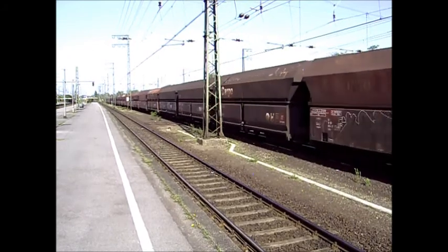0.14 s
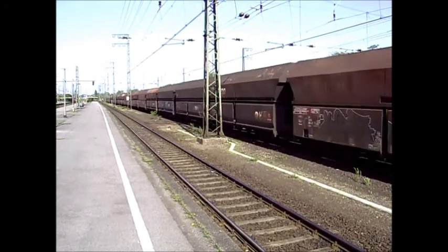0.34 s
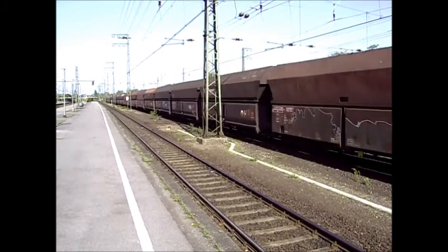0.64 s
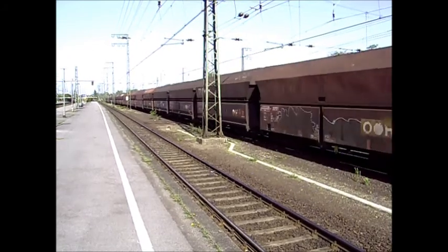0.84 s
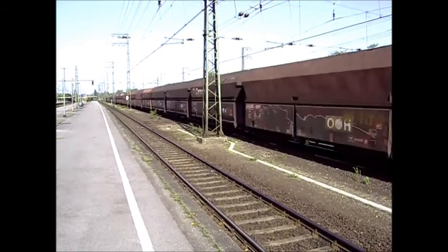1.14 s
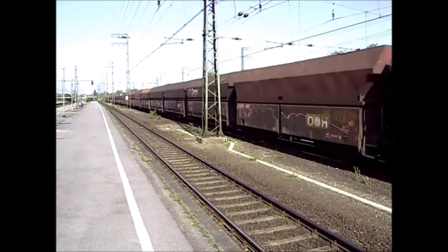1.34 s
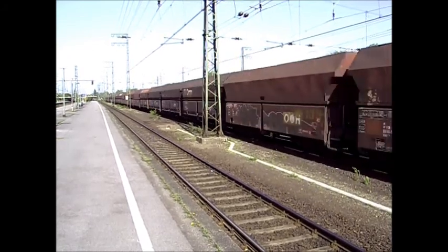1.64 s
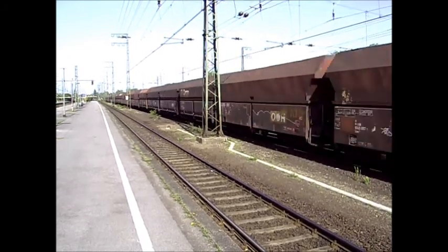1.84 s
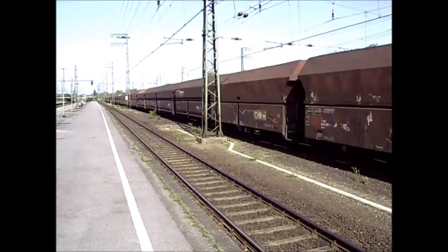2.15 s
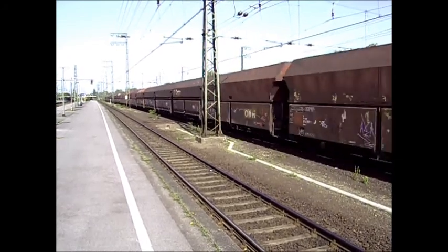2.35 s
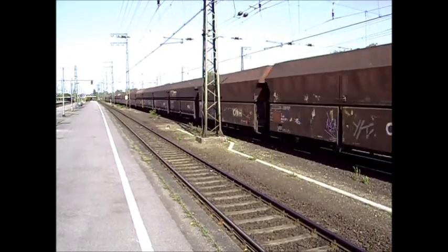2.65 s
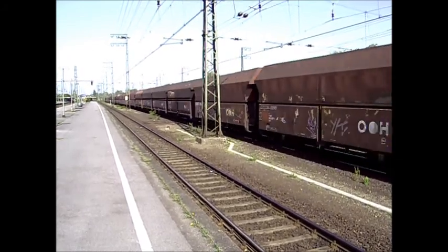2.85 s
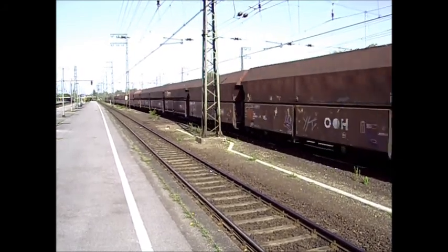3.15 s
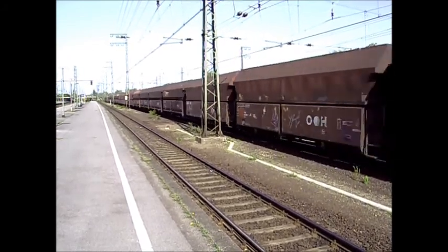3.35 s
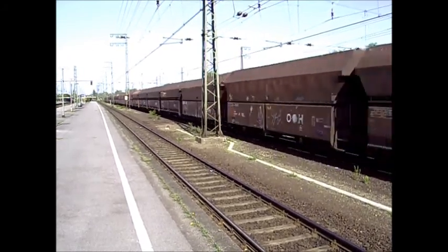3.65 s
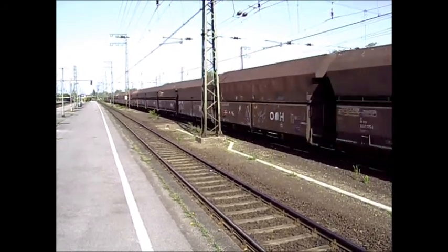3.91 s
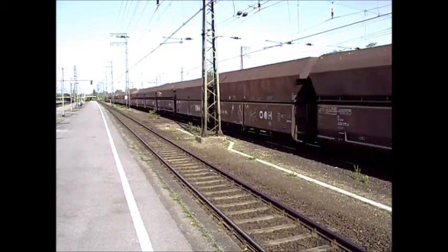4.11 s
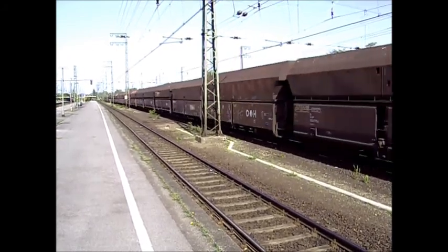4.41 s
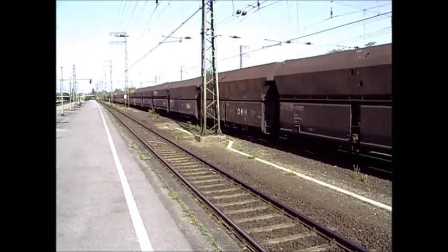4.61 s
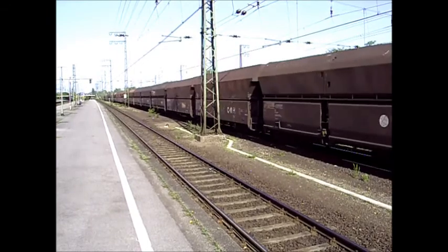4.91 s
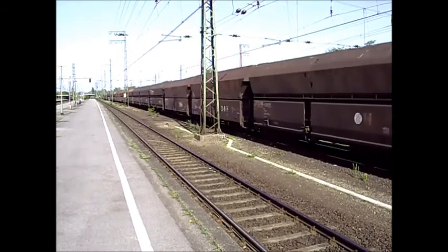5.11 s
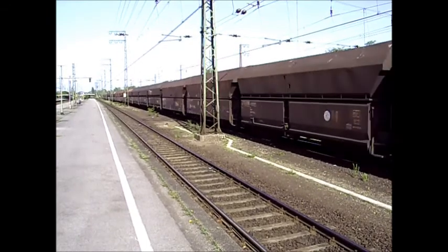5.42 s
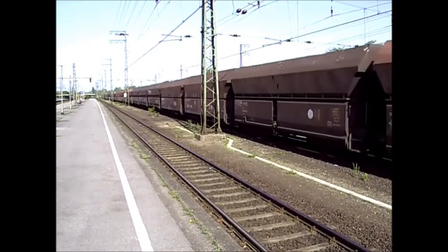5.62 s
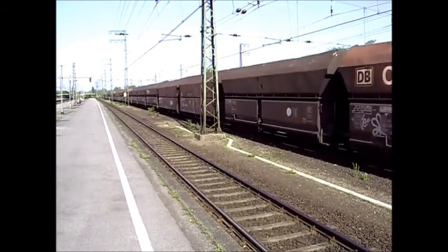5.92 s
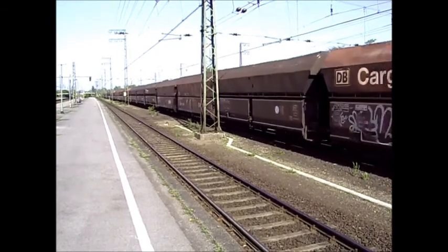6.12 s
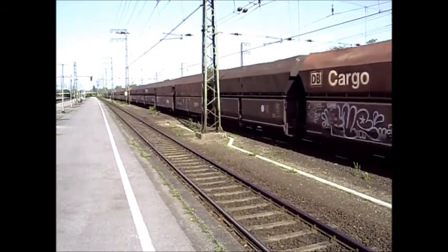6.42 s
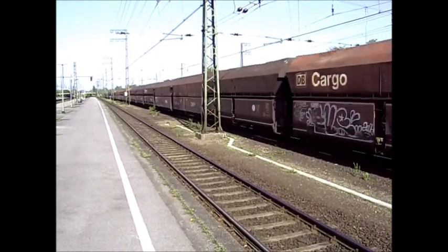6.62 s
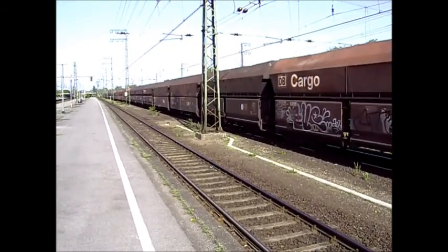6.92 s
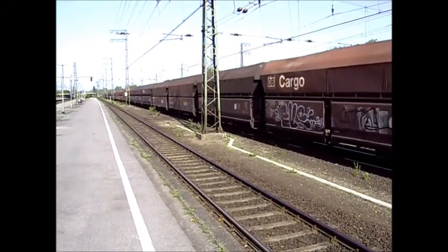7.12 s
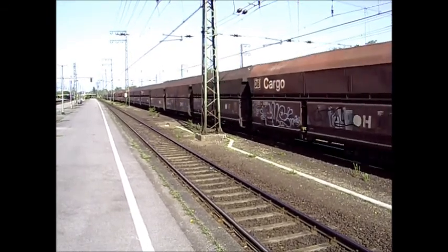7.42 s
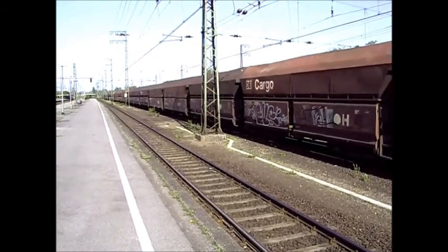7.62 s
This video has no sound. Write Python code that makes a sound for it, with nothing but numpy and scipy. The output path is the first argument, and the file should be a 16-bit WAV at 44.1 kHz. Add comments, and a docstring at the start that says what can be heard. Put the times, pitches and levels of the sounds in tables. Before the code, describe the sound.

Heard from an open station platform, a slow train of empty-sounding steel hopper wagons passes a few tracks away. A piercing wheel squeal dominates from the start, surging and sinking slightly in pitch, with brief higher and lower whistles. Beneath it are gritty flange hiss, steady rolling rumble, hollow thuds and small metallic ticks. The squeal dips midway, returns, then thins near the end with short scraping bursts. The small camera microphone cuts off the highest treble.

```python
"""Hopper train squealing through a station

From the platform, a few tracks off, a small camera's microphone hears a long, slow train of hopper wagons.
Wheels slip sideways on the rail and squeal in their own modes, direct and scattered by wagons and ballast.
One slow course of slip, with brief surges, drives the main squeal and the grinding of the flanges.
Under it wheels roll as shaped noise, wagon bodies resonate, and the running gear ticks and thuds."""
import sys
import numpy as np
from scipy import signal
from scipy.fft import rfft, irfft, next_fast_len
from scipy.io import wavfile
from scipy.ndimage import uniform_filter1d

SR = 44100
rng = np.random.default_rng(int(sys.argv[2]) if len(sys.argv) > 2 else 0)


def wrap_up_sound(samples):
    """Save the sound to the file named by the first command line argument, as 16-bit audio."""
    columns = np.atleast_2d(samples).T
    # keep every value between -1 and 1, then stretch to whole-number steps
    tamed = np.clip(columns, -1, 1)
    steps = np.round(tamed * 32767).astype(np.int16)
    wavfile.write(sys.argv[1], SR, steps)


N = 342216
TIME = np.arange(N) / SR
FREQ = np.maximum(np.fft.rfftfreq(N, 1 / SR), 1)  # kept above zero for logarithms and division


def undb(db):
    """Decibels to gain."""
    return 10 ** (np.asarray(db) / 20)


def unit(x):
    """Scale to rms 1."""
    return x / np.sqrt(np.mean(np.abs(x) ** 2))


def curves(table):
    """The columns of a table after its times, joined by lines, one value a sample."""
    times, *columns = np.transpose(table)
    return [np.interp(TIME, times, column) for column in columns]


def colour(x, points):
    """Filter by a spectrum of f/Hz, level/dB points, joined by lines over log frequency."""
    hz, db = np.transpose(points)
    gain = undb(np.interp(np.log(FREQ), np.log(hz), db))
    return irfft(rfft(x) * gain, N)


def resonate(x, hz, width):
    """One resonance, gain 1 at its centre."""
    detuning = (FREQ ** 2 - hz ** 2) / (FREQ * width)
    return irfft(rfft(x) / (1 + 1j * detuning), N)


def noise():
    """White noise."""
    return rng.standard_normal(N)


def fading(width, steep=2):
    """Random complex gain: the sum of many paths whose Doppler shifts spread over width Hz."""
    shift = np.abs(np.fft.fftfreq(N // 32, 32 / SR))  # made at a 32nd of the sample rate
    paths = np.exp(2j * np.pi * rng.random(len(shift)))
    spread = np.sqrt(1 + (shift / width) ** (2 * steep))
    gain = np.fft.ifft(paths / spread)
    return unit(signal.resample(gain, next_fast_len(N))[:N])


def walk(rate):
    """Smooth random motion of rms 1, averaged twice over 1/rate seconds."""
    knots = rng.standard_normal(int(N / SR * 200))  # 200 a second
    window = max(int(200 / rate), 1)
    slow = uniform_filter1d(uniform_filter1d(knots, window), window)
    return unit(np.interp(TIME, np.linspace(0, N / SR, len(slow)), slow))


def turn(middle, span):
    """A smooth change from 0 to 1 around a moment."""
    return 1 / (1 + np.exp((middle - TIME) / span))


SWELL_SHAPE = 0.36  # power of the half sine: lower is squarer


def swell(start, length):
    """A source starts to sing, holds on for a while and lets go."""
    along = np.clip((TIME - start) / length, 0, 1)
    return np.abs(np.sin(np.pi * along)) ** SWELL_SHAPE


def decay(start, t60, rise):
    """Envelope of one blow: a straight rise times a fall of 60 dB in t60 seconds."""
    age = np.maximum(TIME - start, 0)
    fall = np.exp(-np.minimum(np.log(1000) * age / t60, 20))
    return np.minimum(age / rise, 1) * fall


def squeal(hz, direct_db, spread_hz, waver_hz, steep=2):
    """A wheel mode kept going by stick-slip: a wavering direct tone plus its scattered copies."""
    phase = 2 * np.pi * np.cumsum(hz + waver_hz * walk(25)) / SR
    direct = undb(direct_db + 2.1 * walk(24))
    paths = (direct + fading(spread_hz, steep)) / np.sqrt(1 + undb(direct_db) ** 2)
    return np.sqrt(2) * np.real(paths * np.exp(1j * phase))


# how hard the wheels slip, as a nominal level of their squeal: t/s, level/dB
SLIP_COURSE = [(0, -32.5), (0.25, -34.5), (0.42, -28.5), (0.85, -29.5), (1.1, -25.5), (1.6, -32),
               (1.93, -30.5), (2.15, -32.5), (2.5, -29), (2.8, -25.5), (3.4, -29), (3.7, -26),
               (4.08, -36.5), (4.35, -40.5), (5.15, -29), (5.75, -35), (6.7, -36.5), (7.76, -40)]
# brief surges, when a flange is thrown against the rail: t/s, extra level/dB
FLANGE_SURGES = [(.06, 0.5), (2.108, 8), (2.28, 5.5), (5.85, 2.5), (6.34, 4), (6.85, 3), (6.96, 4),
                 (7.24, 7.5), (7.468, 7.5), (7.65, 5.5)]
SURGE_S, USUAL_SLIP_DB = 0.047, -31  # spread of a surge (Gaussian sigma); reference level of the slip


def slipping():
    """Sideways slip in dB above the usual: a slow course with brief surges."""
    slow_db, = curves(SLIP_COURSE)
    surges_db = sum(db * np.exp(-.5 * ((TIME - s) / SURGE_S) ** 2) for s, db in FLANGE_SURGES)
    return slow_db - USUAL_SLIP_DB + surges_db


# the main mode, after its fall: lower from wheels rolling away, higher from wheels still coming
AWAY_HZ, COMING_HZ = 4292, 4430
# the loud wheel passes and its pitch sinks: middle, time constant and size of the fall
LEAD_PASS_S, LEAD_FALL_S, LEAD_FALL_HZ = 1.9, 0.43, 81.77
# the wheels behind it draw nearer, sink likewise and take over part of the squeal's power
CHORUS_NEAR_S, CHORUS_FALL_S, CHORUS_FALL_HZ = 4.4, 0.41, 84.4
HANDOVER_S, HANDOVER_SPAN_S, CHORUS_SHARE = 4.1, .22, 0.48
CHORUS_PER_DB = 0.75  # the many wheels follow the slip less closely than one wheel
# a second wheel joins the loud one just above it
PARTNER_START_S, PARTNER_LENGTH_S, PARTNER_ABOVE_HZ, PARTNER_DB = 2.15, 2.05, 90, -6.5
# direct over scattered sound of the loud wheel: at usual slip, per dB of slip, gained by passing
DIRECT_DB, DIRECT_PER_DB, DIRECT_PASSED_DB = -6.5, .5, 6.5


def main_squeals(slip_db, bite):
    """The loud wheel nearby, its partner and the chorus of wheels behind them, all in the same mode."""
    passed = turn(LEAD_PASS_S, LEAD_FALL_S)
    hz = AWAY_HZ + LEAD_FALL_HZ * (1 - passed)
    direct_db = DIRECT_DB + DIRECT_PER_DB * slip_db + DIRECT_PASSED_DB * passed
    lead = undb(-0.17 + 0.42 * bite) * squeal(hz, direct_db, spread_hz=44.5, waver_hz=2.5, steep=1.46)

    partner_swell = undb(PARTNER_DB) * swell(PARTNER_START_S, PARTNER_LENGTH_S)
    partner = partner_swell * squeal(hz + PARTNER_ABOVE_HZ, direct_db=-16, spread_hz=52, waver_hz=10)

    coming_hz = COMING_HZ + CHORUS_FALL_HZ * (1 - turn(CHORUS_NEAR_S, CHORUS_FALL_S))
    chorus = undb(-1.0) * squeal(coming_hz, direct_db=-1, spread_hz=61, waver_hz=4)
    # the furthest wheels head straight for the microphone: higher and more diffuse than the chorus
    far = undb(-7.0) * squeal(coming_hz + 45, direct_db=-4.5, spread_hz=61, waver_hz=12)

    share = CHORUS_SHARE * turn(HANDOVER_S, HANDOVER_SPAN_S)
    near = np.sqrt(1 - share) * undb(slip_db) * (lead + partner)
    behind = np.sqrt(share) * undb(CHORUS_PER_DB * slip_db) * (chorus + far)
    return undb(USUAL_SLIP_DB) * (near + behind)


# other wheel modes; NEAR is the same mode before the wheel has passed
LOW_HZ, LOW_NEAR_HZ, MID_HZ, UPPER_HZ, UPPER_NEAR_HZ = 2153, 2186, 3300, 4672, 4728
CHIRP_HZ, WHISTLE_HZ, THIN_HZ, SHRILL_HZ = 6120, 6815, 7035, 7137
# single wheels that sing briefly in those modes:
# start t/s, length t/s, mid-length f/Hz, glide (Hz/s), level/dB, direct over scattered level/dB
BRIEF_SQUEALS = [ (0, 0.57, UPPER_NEAR_HZ, -12.5, -44, -8), (0.283, 0.33, LOW_NEAR_HZ, 0.5, -46.5, -0.5),
                 (.62, .17, LOW_NEAR_HZ, -0.5, -41.5, 4), (0.897, 0.54, LOW_HZ, 2.5, -48, -3.5),
                 (1.101, 1.37, UPPER_HZ, -61.5, -41, -1.5), (2.28, 0.31, LOW_HZ, 0.5, -45, 2),
                 (2.4, .6, MID_HZ, 2, -49.5, -1), (2.77, .36, LOW_HZ, 1.5, -42.5, 5),
                 (3.248, 0.7, MID_HZ, 1, -52.5, -1), (4.35, 0.97, SHRILL_HZ, -2.5, -57.5, 0),
                 (5.13, 0.38, SHRILL_HZ, -2.5, -49, 6), (5.328, 0.33, CHIRP_HZ, 2, -52.5, -2),
                 (5.498, 0.7, WHISTLE_HZ, 0.5, -53, -3.5), (5.596, 0.57, UPPER_HZ, 0, -46, -6),
                 (6.45, 1.25, WHISTLE_HZ, 0, -49, -5), (6.95, .6, MID_HZ, 2, -54, 3),
                 (6.999, .45, THIN_HZ, -40, -58, -3), (7.46, 0.34, WHISTLE_HZ, 0, -47.5, 7), ]
SCATTER_HZ = 40.2  # Doppler spread of their echoes


def other_squeals():
    """Lower and higher wheel modes that break out now and then, each gliding at its own rate."""
    out = 0
    for start, length, hz, glide, db, direct_db in BRIEF_SQUEALS:
        pitch = hz + glide * (TIME - start - length / 2)
        out = out + undb(db) * swell(start, length) * squeal(pitch, direct_db, SCATTER_HZ, waver_hz=4)
    return out


# spectrum of the flange hiss: f/Hz, relative level/dB
GRIND_SPECTRUM = [(1200, -8), (2000, 1.5), (2500, -2), (3100, -3), (3900, 2), (4900, 4.5), (5500, 1.5),
                  (6500, 0), (7050, -2), (7350, -12), (7800, -42)]
# wheel modes rung by the grinding: f/Hz, width f/Hz, relative level/dB
WHEEL_MODES = [(1945, 160, -6), (2167, 140, -2.5), (2713, 200, 3.5), (3370, 150, -1), (3553, 82, 0),
               (5040, 150, -3), (5200, 220, -7.5), (6430, 180, -9), (6030, 290, -2), (6960, 230, 0)]
# grinding at the start, its easing as quieter wagons follow, and its rise with each dB of slip
GRIND_DB, GRIND_FADE_DB_PER_S, GRIND_PER_DB = -40, 0.14, 0.57


def grinding(slip_db, bite):
    """Flanges scrape the rail head: dense uneven micro-slips hiss and ring the wheels."""
    slips = noise() * undb(1.3 * walk(90))
    hiss = colour(slips, GRIND_SPECTRUM)
    rings = 0
    for hz, width, mode_db in WHEEL_MODES:
        ring = resonate(resonate(noise(), hz, width), hz, width)
        rings = rings + undb(mode_db) * ring
    db = GRIND_DB + GRIND_PER_DB * slip_db - GRIND_FADE_DB_PER_S * TIME
    return undb(db + 0.3 * bite) * unit(hiss + undb(2.0) * rings)


# spectrum of wheels and track: f/Hz, relative level/dB
ROLL_SPECTRUM = [(300, -16.5), (550, 0), (700, 0), (850, 3.5), (1030, 3.5), (1170, -0.5), (1500, 0),
                 (1900, 3), (2400, 0.5), (3200, -1.5), (4500, -2), (7000, -37.5)]
# spectrum of the bogie frames: f/Hz, relative level/dB
FRAME_SPECTRUM = [(20, -5.5), (50, -1), (100, 1.5), (160, 1), (230, 1), (380, -0.5), (500, -6),
                  (800, -33.5)]
# course of the wheels rolling on the rail, before a fixed lift: t/s, level/dB
ROLLING_COURSE = [(0, -43.0), (0.45, -42.0), (1.1, -43.0), (1.45, -46), (2.1, -43), (2.45, -45.0),
                  (2.8, -44.0), (4.1, -46.0), (4.9, -44.5), (6, -45.5), (7.76, -46.5)]
# wheels dropping over rail joints, as drive levels:
# t/s, ring of the hopper level/dB, bounce on the springs level/dB
JOINT_THUDS = [(.16, -49, -41.5), (2.06, -43, -59), (2.29, -47, -59), (3.45, -47, -46.5),
               (4.091, -56.5, -47.5), (4.23, -40.5, -56), (4.419, -49.5, -46), (4.64, -45.5, -51),
               (4.92, -43, -38.5), (5.7, -55.5, -47.5), (6.019, -50.5, -44), (6.7, -56.5, -49)]
FRAME_DB, FRAME_FADE_DB_PER_S = -47, 0.13  # at the start; easing as quieter wagons follow
BOOM_DB, BOUNCE_T60_S = -52, 0.81  # wagons swaying on their springs; decay after a joint


def rolling(bite):
    """Rail roughness shakes wheels and track, the bogie frames and the sprung wagons, which bounce at joints."""
    roll_db, = curves(ROLLING_COURSE)
    track = undb(roll_db + 4.5 + 0.48 * bite) * unit(colour(noise(), ROLL_SPECTRUM))
    frame_db = FRAME_DB - FRAME_FADE_DB_PER_S * TIME + 0.63 * walk(4.2)
    frames = undb(frame_db) * unit(colour(noise(), FRAME_SPECTRUM))
    bounces = sum(undb(db) * decay(s, t60=BOUNCE_T60_S, rise=.04) for s, _, db in JOINT_THUDS)
    sway = unit(resonate(resonate(noise(), 55, 38), 66, 44))
    boom = np.hypot(undb(BOOM_DB), bounces) * sway
    return track + frames + boom


# hollow modes of the steel hoppers: f/Hz, width f/Hz, relative level/dB
HOPPER_MODES = [(324, 30, -3.5), (390, 97, 3), (408, 40, -3.5), (496, 35, -5)]
DRONE_DB, DRONE_FADE_DB_PER_S = -47.5, 2.14  # drive at the start; easing as quieter wagons follow


def hoppers():
    """The hollow bodies drone as they roll and ring out at each rail joint."""
    blows = sum(undb(db) * decay(s, t60=0.63, rise=.012) for s, db, _ in JOINT_THUDS)
    drone = undb(DRONE_DB - DRONE_FADE_DB_PER_S * TIME)
    shaking = noise() * np.hypot(drone, blows)
    ring = sum(undb(db) * resonate(shaking, hz, width) for hz, width, db in HOPPER_MODES)
    return unit(ring) * np.std(shaking)  # as loud overall as the shaking that drives it


# the modes that sound in the groan: f/Hz, level/dB
GROAN_MODES = [(315, -45.5), (492, -47.5)]
GROAN_START_S, GROAN_LENGTH_S = .17, 0.12


def groan():
    """Steel rubs once on steel and a wagon body gives one short, hollow groan."""
    modes = sum(undb(db) * squeal(hz, direct_db=9, spread_hz=15, waver_hz=4) for hz, db in GROAN_MODES)
    return swell(GROAN_START_S, GROAN_LENGTH_S) * modes


# ticks of couplings and brake rigging: t/s, level/dB
GEAR_TICKS = [(1.638, -32), (2.127, -37), (2.317, -29), (2.588, -34), (2.859, -22), (4.217, -39),
              (5.031, -22), (5.69, -34), (5.981, -39), (6.796, -39), (7.203, -41), (7.45, -32.5)]


def ticks():
    """Loose steel strikes steel: short bright cracks."""
    blows = sum(undb(db) * decay(s, t60=0.009, rise=0.0016) for s, db in GEAR_TICKS)
    return blows * unit(resonate(noise(), 5000, 3600))


def scene():
    """All sources, heard from the platform."""
    slip_db = slipping()
    bite = walk(28)  # contact force flutters as the wheels hunt on the rail
    wheels = main_squeals(slip_db, bite) + other_squeals() + grinding(slip_db, bite)
    wagons = rolling(bite) + hoppers() + groan() + ticks()
    return (wheels + wagons)[None]


TOP_HZ = 7500


def record(dry):
    """The camera's microphone keeps only what lies below a steep cut in the treble."""
    return signal.sosfilt(signal.cheby1(14, .1, TOP_HZ, fs=SR, output="sos"), dry)


dry = scene()
out = record(dry)
wrap_up_sound(out)
```